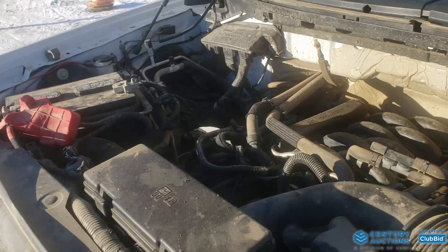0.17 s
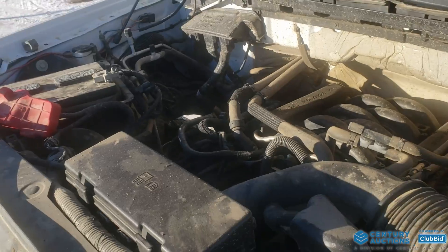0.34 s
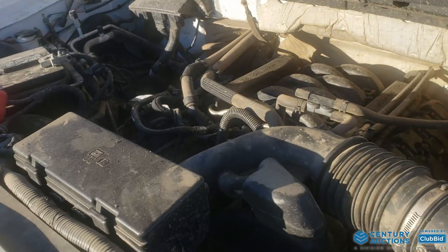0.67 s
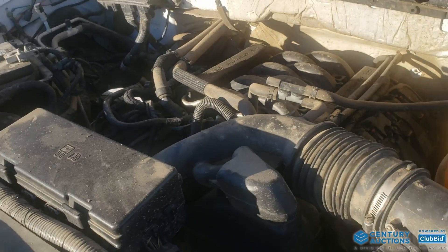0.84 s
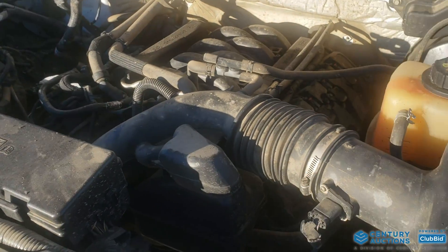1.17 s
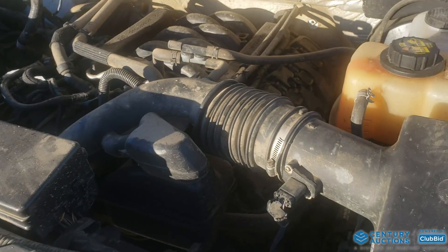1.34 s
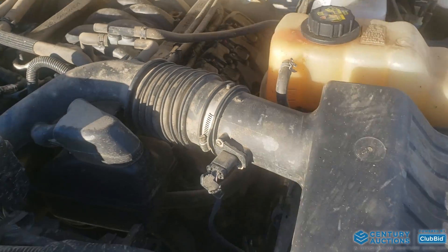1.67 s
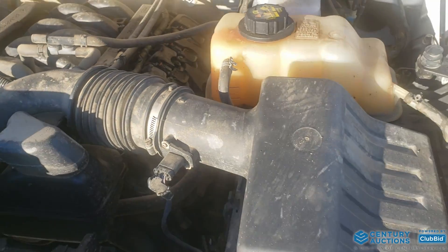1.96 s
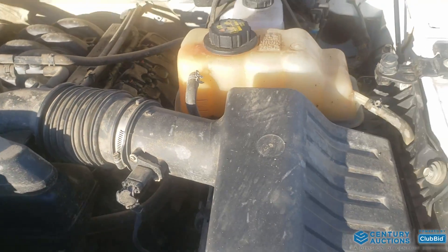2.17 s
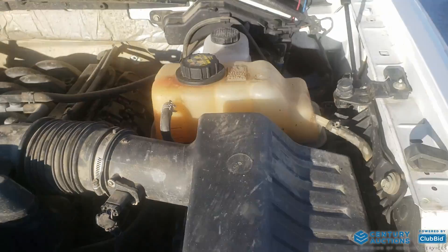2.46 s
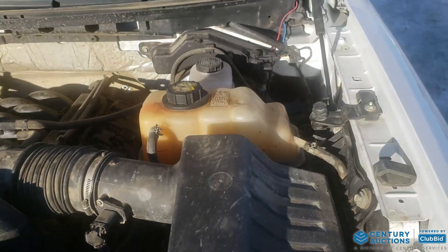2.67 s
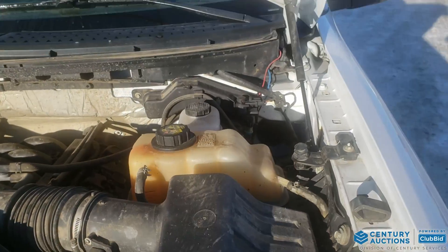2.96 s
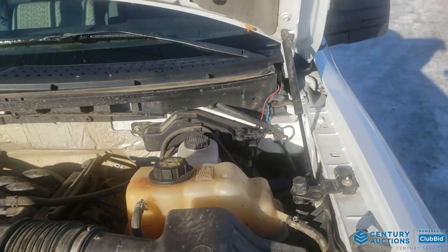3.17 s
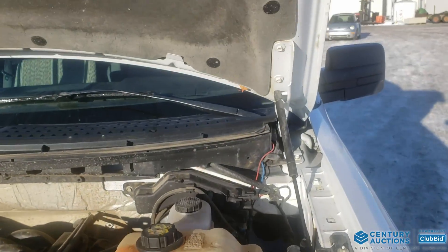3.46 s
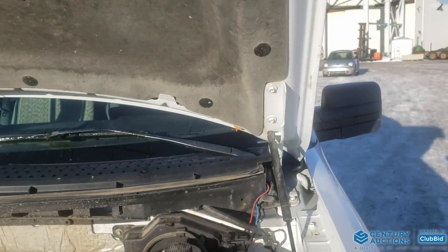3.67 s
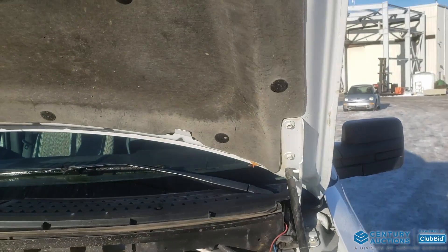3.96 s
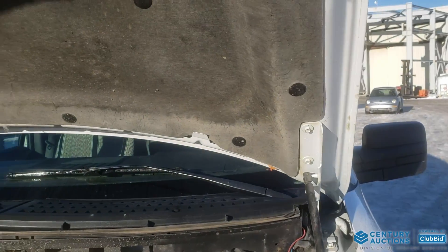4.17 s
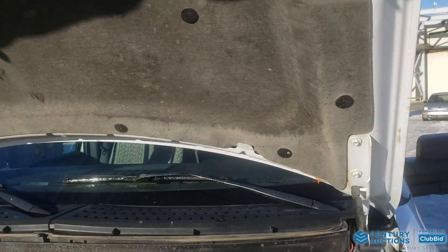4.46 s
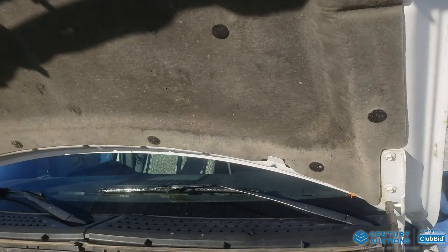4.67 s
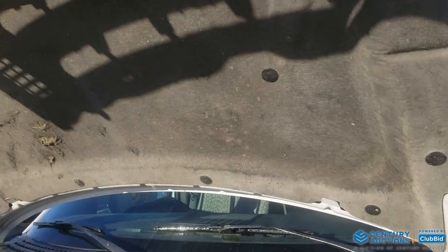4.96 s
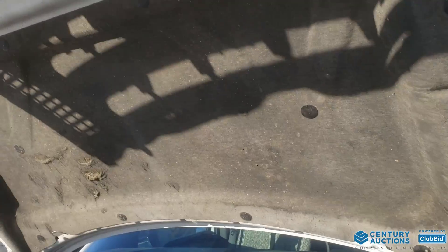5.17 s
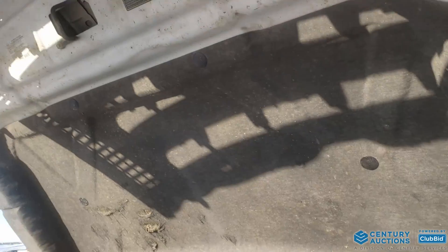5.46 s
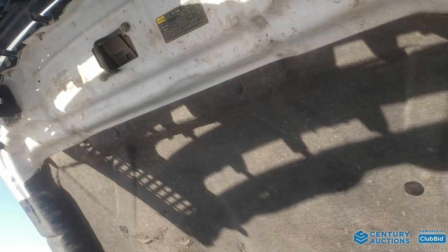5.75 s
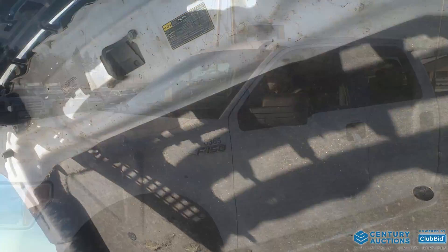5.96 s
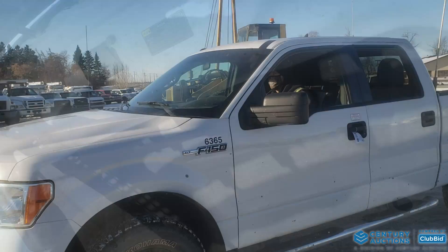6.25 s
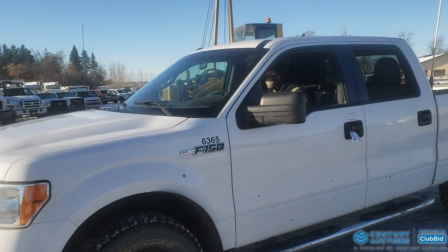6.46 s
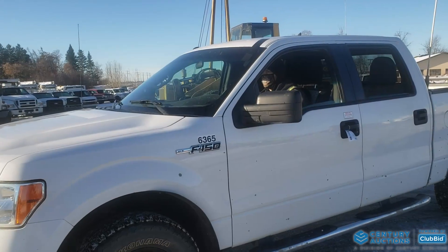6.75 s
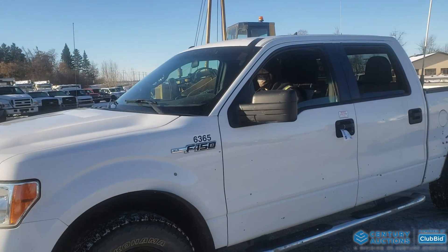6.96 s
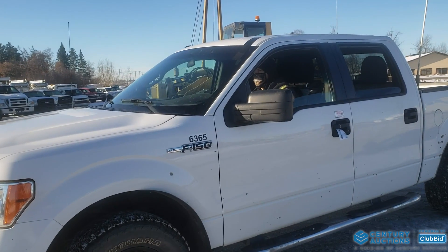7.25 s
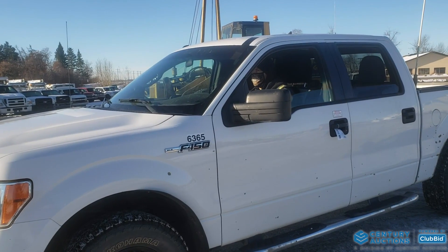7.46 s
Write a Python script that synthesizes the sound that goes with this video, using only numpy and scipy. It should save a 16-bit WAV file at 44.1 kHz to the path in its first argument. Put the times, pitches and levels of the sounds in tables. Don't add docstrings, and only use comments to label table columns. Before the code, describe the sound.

Close at an open truck hood, a V8 idles briefly, then a throttle stab makes it boom and bark upward before slowly winding down with whining belt drive and fan roar. A second, harsher and higher rev growls and falls away. The close engine then fades into a quiet, steady idle with distant traffic in an open yard. Handheld stereo microphone, shifting slightly.

```python
import sys
import numpy as np
from scipy import signal
from scipy.fft import rfft, irfft, next_fast_len
from scipy.io import wavfile
from scipy.ndimage import uniform_filter1d, map_coordinates

SR = 44100
rng = np.random.default_rng(int(sys.argv[2]) if len(sys.argv) > 2 else 0)


def put_to_file(sound):
    columns = np.atleast_2d(sound).T
    safe = np.clip(columns, -1, 1)
    whole_steps = np.round(safe * 32767)
    wavfile.write(sys.argv[1], SR, whole_steps.astype(np.int16))


def invert_db(level):
    return 10 ** (np.asarray(level, dtype=float) / 20)


N = 336041
T = np.arange(N) / SR

# time_s, firing_hz
ENGINE_SPEED = [(0, 57.96), (.28, 57.8), (.45, 88.16), (.63, 143.4), (.8, 208.2), (.93, 235), (1.17, 207.2),
                (1.65, 169.5), (2.1, 133.1), (3.12, 85.85), (3.3, 123.4), (3.56, 224.8), (3.73, 261.8),
                (3.99, 230.9), (4.25, 219.3), (4.85, 156.2), (5.4, 121.1), (6.45, 84.3)]
# open_s, shut_s, boom_db, growl_db, unevenness (0-1)
THROTTLE_STABS = [
    (0.282, 0.829, -1, -9.5, 0.4),
    (3.189, 3.622, -5, -2.5, 0.74),
]
WEAK_BREATH_S = [.548, 3.33]
CYLINDER_SUCTION = [-4.5, 2.5, -3.5, -35, -9, 4.5, 1, -7]
# firing_hz, level_db
OPEN_BOOM = [(64, -39), (81, -17.5), (98, -2.5), (124, -5), (145, -9.5), (175, -18.5), (205, -25),
             (240, -46)]
# firing_hz, level_db
SHUT_BOOM = [(60, -41), (98, -53), (120, -40), (145, -39), (167, -29.5), (205, -34.5), (225, -35.5),
             (250, -31.5)]
BOOM_TILT = [-3, 7]
# firing_hz, share (0-1)
UNEVEN_SHARE = [(100, 0), (125, 0.69), (150, 1), (200, 0.65)]
# firing_hz, level_db
CAVITY_RING = [(70, -41), (93, -20), (108, -65), (123, -21.5), (150, -25), (176, -28.5), (205, -25.5),
               (235, -19.5)]
# pitch_hz, width_hz, level_db
SLOW_CAVITY = [(168, 30, -3), (262, 28, 0), (305, 30, -6)]
# pitch_hz, width_hz, level_db
FAST_CAVITY = [(195, 30, -18), (312, 26, 0), (425, 35, -8)]
# firing_hz, level_db
DUCT_GROWL = [(70, -41), (90, -33.5), (125, -30), (170, -19.5), (200, -14.5), (245, -15)]
# pitch_hz, width_hz, level_db
DUCT_MODES = [(397, 18.6, 9.5), (519.7, 15, 11.5), (622, 74, 7), (796, 140, 2.5)]
# level_db at 150 firings a second, db_per_octave of speed, open_throttle_db
RUMBLE_RULE = (-34.5, -1.2, 3.8)
ROAR_RULE = (-32, 10.6, 3.5)
CLATTER_RULE = (-36, 7.9, 4.2)
MUTTER_RULE = (-31, 4.2, 0.5)
AIR_RULE = (-37.5, 1, 3.8)
SQUEAL_RULE = (-45.5, -0.048, -7)
WHINE_RULES = [
    (-43, 3, 6),
    (-52, 15, 1),
    (-53, 14, 1),
    (-46.5, 12, 0),
]
# turns per crank turn, level_db
SHAFT_TONES = [(1, -7), (1.52, 0), (3.03, -2)]
OVERTONE_TONES = [(5, -7), (5.42, -5), (6, -7), (6.5, -10), (8, -3), (11, -10), (12, 0), (20, -7)]
ALTERNATOR_TONES = [(24.45, 0), (27.7, -13), (42.8, -13)]
FAN_TONES = [(9.3, -7), (10.6, -5), (14.5, -5), (16, 0), (18.4, 0), (21.2, -7), (22.5, -3), (30.6, -8),
             (33.5, -9)]
# first_place_db, second_place_db
FAMILY_FACING = [
    (0, 0),
    (1.5, 0),
    (-7, 1),
    (.5, -2.5),
]
BAY_COUPLING = [
    1,
    1,
    1,
    .3,
]
# pitch_hz, width_hz, level_db
BAY_MODES = [(57, 10, 6), (315, 40, 12), (445, 60, 10), (675, 60, 14), (800, 50, 9), (1040, 50, 7),
             (1238, 60, 19), (1405, 60, 21), (1560, 90, 21), (1780, 80, 15), (2750, 160, 22)]
CAMERA_STEP_S = [2.3, 3.2]
RUMBLE_PLACES = [2, -1.5]
# firing_hz, level_db
IDLE_RUMBLE = [(62, -4), (85, 0)]
# pitch_hz, level_db per Hz
RUMBLE_COLOUR = [(15, -51), (25, -46), (48, -24), (70, -8), (113, 6), (162, 3.5), (185, -14), (210, -6),
                 (260, -3), (340, -58), (570, -120)]
MUTTER_COLOUR = [(120, -53), (200, 3), (211, -11), (276, -6.5), (382, -8.5), (431, -6), (496, -6),
                 (659, 0.5), (845, -9.5), (1000, -9), (1300, -17.5), (2200, -120)]
FAN_COLOUR = [(470, -62), (800, -3.5), (1060, -3.5), (1230, 3), (1590, -5), (2530, -5), (2800, -8.5),
              (3640, -27), (6160, -120)]
CLATTER_COLOUR = [(1290, -23), (2200, -12), (2650, -10), (2940, -4.5), (4330, -2.5), (5560, -11.5),
                  (7490, -12.5), (9280, -17.5), (11500, -16), (15000, -44), (22000, -120)]
AIR_COLOUR = [(5590, -11), (9500, -10.5), (13300, -3), (15100, -7), (15800, -8)]
PUFF_COLOUR = [(1200, -120), (2000, 2), (4000, 3), (7000, 4.5), (9000, -0.5), (12000, 0.5), (16000, 7.5)]
OPEN_RUSH_COLOUR = [(1500, -37), (3000, -8), (5500, 4.5), (7900, 1.5), (8300, -13), (12000, -5), (15800, -9)]
YARD_THRUM_COLOUR = [(15, -43), (25, -26), (43, -8), (64, 1.5), (81, -18), (128, -3), (161, -3.5),
                     (295, -14.5), (450, -26.5), (580, -51), (990, -120)]
TRAFFIC_COLOUR = [(210, -37), (350, -12), (379, -8), (452, -8.5), (497, -7.5), (764, -4.5), (827, -3),
                  (1100, -11), (1470, -9), (1750, -14.5), (2910, -29), (10100, -33.5), (15800, -35)]
# start_s, end_s, level_db
PLATE_PUFFS = [
    (0.235, 0.354, -23.5),
    (0.366, 0.505, -29),
    (3.099, 3.227, -28),
    (3.45, 4.402, -32.5),
]
# start_s, end_s, level_db
OPEN_RUSH = (0.5, 1.095, -33)
# time_s, centre_hz
BELT_PITCH = [(0, 12300), (.4, 11500), (.6, 12600), (1.1, 13100), (2.1, 12800), (2.75, 12050), (3.1, 12000),
              (3.6, 13300), (4.1, 13500), (4.5, 13100), (4.92, 12900), (5.85, 11800), (6.4, 11500)]
# time_s, level_db, length_s
BELT_SLIPS = [(.4, -45, .1), (2.22, -40, .1), (2.6, -44, .12), (2.9, -45, .12), (4.92, -42, .1),
              (5.33, -39, .25), (5.85, -43, .15), (6.22, -41, .15)]
# firing_hz, squeal_db
BELT_GRIP = [(62, -12), (85, 0)]
# pitch_hz, likeness (-1 to 1), under the hood and across the yard
LIKENESS_NEAR = [(60, 0.73), (130, 1), (290, 0.91), (640, 0.82), (1400, 0.17), (3000, 0.1), (7000, 0.14),
                 (15000, 0.06)]
LIKENESS_FAR = [(60, 0.88), (130, 0.89), (290, 0.96), (640, 0.14), (1410, -0.6), (3100, 0.31),
                (6820, -0.0099), (15000, -0.2)]
# start_s, end_s
CLOSE_FADE_S = [5.89, 6.403]
# pitch_hz, width_hz, level_db
TAILPIPE_MODES = [(60.4, 41, 2), (120, 25, 2.5), (164, 33, -3), (237, 34, -1)]
# time_s, left_lag_samples, left_over_right_db, nearness_db
CAMERA_AIM = [(0, 12, -2.5, 4), (.7, 10.5, -1, 2.2), (1.2, -4, 0.5, -1.5), (1.7, -1, 1, -1.7),
              (2.2, -4, 1, -0.6), (2.7, -4.5, 2, -0.8), (3.2, -8.5, 1.5, 1), (3.7, -4.5, 1.5, -0.4),
              (4.2, -5.5, 1.4, -0.94), (5.2, -2, 1.2, -1.3), (5.7, 6, 1.5, -1.8), (6.2, 1.5, 0.7, -0.7),
              (6.6, -2.5, 1, 0)]
# pitch_hz, left_over_right_db
PORT_LEAN = [(60, 0.5), (110, 0), (200, 0.5), (380, 1), (700, -1.5), (1290, -2.5), (2380, -2), (4400, -3),
             (8120, -2), (15000, 0.5)]


def engine():
    firing_hz = speed()
    firings = np.cumsum(firing_hz) / SR
    opening, boom_db, growl_db, lope = throttle()
    load = stabs(0.57, 0.54)

    tilt_db = np.interp(T, CAMERA_STEP_S, BOOM_TILT) * np.log2(firing_hz / 120)
    breath = opening * invert_db(along(OPEN_BOOM, firing_hz) + boom_db + tilt_db)
    coasting = (1 - opening) * invert_db(along(SHUT_BOOM, firing_hz))
    uneven = 0.04 + opening * lope * along(UNEVEN_SHARE, firing_hz)
    boom = intake_boom(firings, breath + coasting, uneven)
    echo = np.array([[1], [-1]]) * invert_db(-18.5) * np.imag(signal.hilbert(boom))

    gulping = opening * invert_db(along(DUCT_GROWL, firing_hz) + growl_db)
    muttering = invert_db(law(MUTTER_RULE, firing_hz, opening))
    squeal_db = law(SQUEAL_RULE, firing_hz, opening) + along(BELT_GRIP, firing_hz)
    air_db = law(AIR_RULE, firing_hz, opening)
    flutter_db = .8 * wobble(26)
    near = growl(firings, gulping, muttering)
    near = near + block_rumble(firing_hz, opening, breath)
    near += fan_roar(firing_hz, load)
    near += valve_clatter(firings, firing_hz, load, flutter_db)
    near += whines(firings, firing_hz, load)
    near += air_bursts()
    near += invert_db(flutter_db) * belt_whistle(firings, squeal_db, air_db)
    near *= invert_db(curves(CAMERA_AIM)[2])

    fade = np.interp(T, CLOSE_FADE_S, [1, 0]) ** 1.15
    return fade * (near + boom + echo + opening * bark(firings, firing_hz))


def speed():
    size = int(.07 * SR)
    once = uniform_filter1d(curves(ENGINE_SPEED)[0], size=size)
    return uniform_filter1d(once, size=size)


def throttle():
    first, second = np.array(THROTTLE_STABS)[:, 2:, None]
    return stabs(.065, .15), *np.where(T < np.mean(WEAK_BREATH_S), first, second)


def stabs(rise_s, fall_s):
    return sum(np.interp(T, [start, start + rise_s, end, end + fall_s], [0, 1, 1, 0])
               for start, end, *_ in THROTTLE_STABS)


def law(rule, firing_hz, opening):
    level_db, octave_db, open_db = rule
    return level_db + octave_db * np.log2(firing_hz / 150) + open_db * opening


def intake_boom(firings, tone, uneven):
    anchors = np.interp(WEAK_BREATH_S, T, firings)
    cycle = (firings - np.where(T < np.mean(WEAK_BREATH_S), *anchors)) / 8
    weak = (.5 + .5 * np.cos(2 * np.pi * cycle)) ** 1.67
    throb = 1 - np.clip(uneven, 0, 1) * (2 * weak - .6)
    phase = 2 * np.pi * firings + 0.18 * wobble(14)
    return np.sqrt(2) * tone * invert_db(.8 * wobble(9)) * throb * np.sin(phase)


def bark(firings, firing_hz):
    count = firings.astype(int)
    suction = invert_db(np.array(CYLINDER_SUCTION))[count % len(CYLINDER_SUCTION)]
    sizes = suction - .45 + .4 * rng.standard_normal(N // 20)[count]
    snaps = sizes * np.diff(count, prepend=0)

    def cavity(modes):
        return filtered(snaps, lambda hz: resonances(modes)(hz) * resonances([(250, 300, 0)])(hz) ** 2)

    fast = np.interp(firing_hz, [130, 185], [0, 1])
    ring = (1 - fast) * cavity(SLOW_CAVITY) + fast * cavity(FAST_CAVITY)
    loudness = np.sqrt(abs(uniform_filter1d(ring ** 2, size=SR // 16)) + 1e-20)
    return invert_db(along(CAVITY_RING, firing_hz) + 1.5) * ring / loudness


def growl(firings, gulping, muttering):
    gulp = (.5 + .5 * np.cos(2 * np.pi * firings)) ** 7.0
    sizes = invert_db(2 * rng.standard_normal(N // 20))[firings.astype(int)]
    turbulence = gulp * sizes * rng.standard_normal((2, N))
    duct = lambda hz: resonances(DUCT_MODES)(hz) * hz ** 2 / (hz ** 2 + 350 ** 2)
    mid, side = unit(filtered(turbulence, duct))
    side = .35 * side
    mutter = rush(MUTTER_COLOUR, LIKENESS_NEAR, patchy_db=1.5)
    return gulping * np.array([mid + side, mid - side]) + muttering * mutter


def block_rumble(firing_hz, opening, breath):
    place_db = np.interp(T, CAMERA_STEP_S, RUMBLE_PLACES)
    steady = invert_db(law(RUMBLE_RULE, firing_hz, opening) + place_db + along(IDLE_RUMBLE, firing_hz))
    shaken = invert_db(-12.5) * breath
    return (steady + shaken) * invert_db(0.53 * wobble(7.3)) * rush(RUMBLE_COLOUR, LIKENESS_NEAR, patchy_db=-1.5)


def fan_roar(firing_hz, load):
    return invert_db(law(ROAR_RULE, firing_hz, load)) * rush(FAN_COLOUR, LIKENESS_NEAR, patchy_db=1.2)


def valve_clatter(firings, firing_hz, load, flutter_db):
    ticking = 1 + 0.06 * np.cos(2 * np.pi * firings) + 0.13 * np.cos(2 * np.pi * firings / 4)
    clatter = rush(CLATTER_COLOUR, LIKENESS_NEAR, patchy_db=1.0, gate=ticking)
    return invert_db(law(CLATTER_RULE, firing_hz, load) + flutter_db) * clatter


def whines(firings, firing_hz, load):
    out, grid_hz = np.zeros(N), np.arange(4000)
    peaks = sum((invert_db(db) / (1 + (2 * (grid_hz - hz) / width) ** 2)) ** 2 for hz, width, db in BAY_MODES)
    lift = np.sqrt(1 + peaks)
    families = [SHAFT_TONES, OVERTONE_TONES, ALTERNATOR_TONES, FAN_TONES]
    wavers_db = [2.5, 2, .8, 3.5]
    for family, rule, place_db, coupling, waver_db in zip(
            families, WHINE_RULES, FAMILY_FACING, BAY_COUPLING, wavers_db):
        level_db = law(rule, firing_hz, load) + np.interp(T, CAMERA_STEP_S, place_db)
        for turns, tone_db in family:
            phase = 2 * np.pi * turns * firings / 4
            gain = np.interp(turns * firing_hz / 4, grid_hz, lift ** coupling)
            level = gain * invert_db(level_db + tone_db + waver_db * wobble(8))
            out += level * np.sin(phase + .4 * wobble(14))
    return np.sqrt(2) * out


def air_bursts():
    puffs = sum(gust(*row) for row in PLATE_PUFFS)
    plate = puffs * rush(PUFF_COLOUR, LIKENESS_NEAR, patchy_db=-3.5)
    return plate + gust(*OPEN_RUSH) * rush(OPEN_RUSH_COLOUR, LIKENESS_NEAR, patchy_db=-0.5)


def gust(start_s, end_s, level_db):
    times_s = [start_s - .035, start_s + 0.069, end_s - .02, end_s + 0.01]
    return invert_db(level_db) * np.interp(T, times_s, [0, 1, 1, 0])


def belt_whistle(firings, steady_db, air_db):
    centre_hz, = curves(BELT_PITCH)
    slips = sum(invert_db(db) * np.exp(-((T - s) / length) ** 2) for s, db, length in BELT_SLIPS)
    level = invert_db(steady_db) + slips
    chirp = (.5 + .5 * np.cos(2 * np.pi * firings / 4)) ** 1.5 + .35
    streaks = np.zeros((2, N))
    for offset_hz, streak_db in [(-450, -3), (0, 2), (420, -1), (1896, -11)]:
        slow = filtered(rng.standard_normal((2, 2, N)), lambda hz: 1 / (1 + (hz / 200) ** 2))
        phase = 2 * np.pi * np.cumsum(centre_hz + offset_hz) / SR
        hiss = unit(slow[0] * np.cos(phase) + slow[1] * np.sin(phase))
        streaks += hiss * invert_db(streak_db + 3 * wobble(11))
    air = rush(AIR_COLOUR, LIKENESS_NEAR, patchy_db=1.5)
    return level * unit(chirp * streaks) + invert_db(air_db) * air


def yard():
    count = (40 * T + .25 * wobble(5)).astype(int).clip(0)
    puffs = (1 + .45 * rng.standard_normal(N // 100)[count]) * np.diff(count, prepend=0)
    pipe = unit(filtered(puffs, resonances(TAILPIPE_MODES)))
    thrum = invert_db(-41.5) * (.55 * pipe + rush(YARD_THRUM_COLOUR, LIKENESS_FAR, patchy_db=1))
    traffic = invert_db(-44 + .5 * wobble(6)) * rush(TRAFFIC_COLOUR, LIKENESS_FAR, patchy_db=.7)
    whine = invert_db(-76 + 4 * wobble(8)) * np.sin(2 * np.pi * 9706 * T + .8 * wobble(20))
    fade = np.interp(T, [5.8, 6.35], [0, 1])
    return fade * (thrum + traffic + whine)


def rush(colour, alike, patchy_db, gate=1):
    z = signal.stft(gate * rng.standard_normal((2, N)), nperseg=512)[2]
    field = rng.standard_normal(z.shape[1:])
    field = uniform_filter1d(uniform_filter1d(field, size=6, axis=0), size=8, axis=1)
    pair = signal.istft(z * invert_db(patchy_db * unit(field)), nperseg=512)[1][:, :N]

    def spread(hz):
        angle = np.arccos(np.clip(along(alike, hz), -1, 1)) / 2
        return invert_db(along(colour, hz)) * np.array([np.cos(angle), np.sin(angle)])

    mid, side = filtered(pair, spread)
    return unit(np.array([mid + side, mid - side]))


def resonances(modes):
    return lambda f: sum((-1) ** k * invert_db(db) * 1j * f * width / (hz * hz - f * f + 1j * f * width)
                         for k, (hz, width, db) in enumerate(modes))


def filtered(x, response):
    m = next_fast_len(N + SR // 4)
    return irfft(rfft(x, m) * response(np.fft.rfftfreq(m, 1 / SR)), m)[..., :N]


def wobble(rate_hz):
    knots = rng.standard_normal(int(N * 60 / SR) + 4)
    return map_coordinates(knots, [T * np.clip(rate_hz, .1, 59)])


def curves(rows):
    time_s, *columns = np.transpose(rows)
    return [np.interp(T, time_s, column) for column in columns]


def along(points, hz):
    f, value = np.transpose(points)
    return np.interp(np.log(hz + 1), np.log(f + 1), value)


def unit(x):
    return x / np.sqrt(np.mean(x ** 2) + 1e-20)


def scene():
    left, right = engine() + yard()
    lag, lean_db, _ = curves(CAMERA_AIM)
    at = np.arange(N)
    ports = [map_coordinates(left, [at - lag / 2]), map_coordinates(right, [at + lag / 2])]
    return np.array(ports) * invert_db(np.array([lean_db, -lean_db]) / 2)


def roll_off(x):
    return signal.sosfilt(signal.butter(12, 15910, fs=SR, output="sos"), x)


def record(dry):
    def ports(hz):
        lean = invert_db(np.array([[.5], [-.5]]) * along(PORT_LEAN, hz))
        return lean * (hz < 15900) * hz ** 4 / (hz ** 4 + 36 ** 4)

    x = filtered(dry, ports)
    x = x / (1 + np.abs(x / 1.1) ** 6) ** (1 / 6)
    return roll_off(x)


dry = scene()
out = record(dry)
put_to_file(out)
```